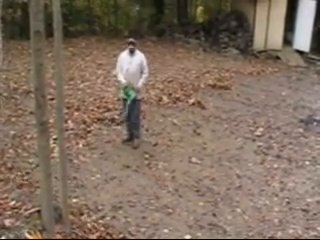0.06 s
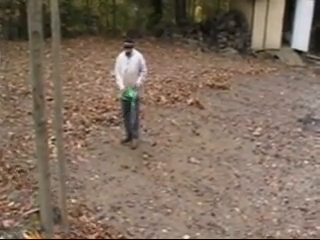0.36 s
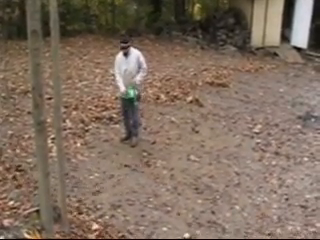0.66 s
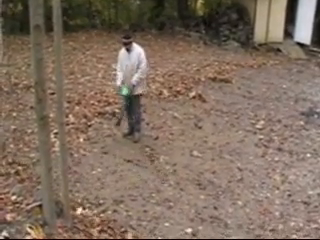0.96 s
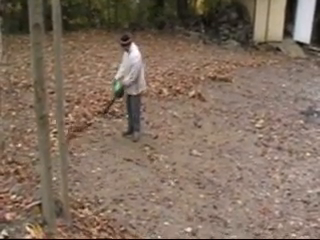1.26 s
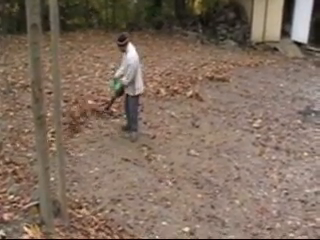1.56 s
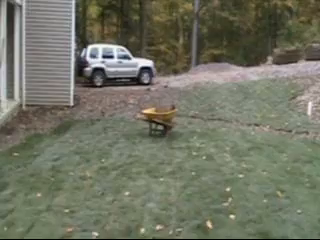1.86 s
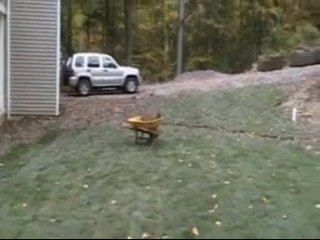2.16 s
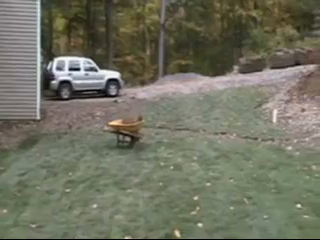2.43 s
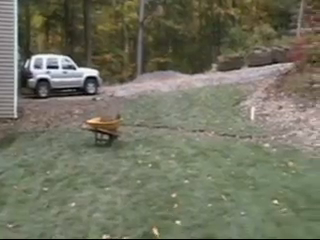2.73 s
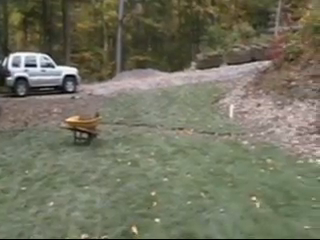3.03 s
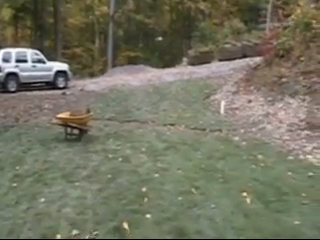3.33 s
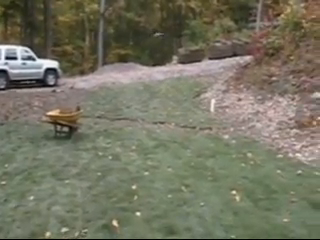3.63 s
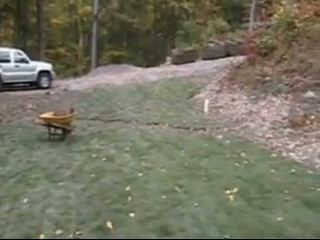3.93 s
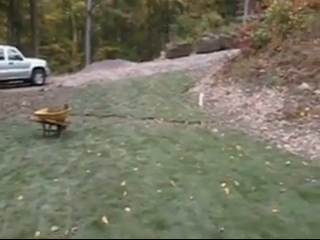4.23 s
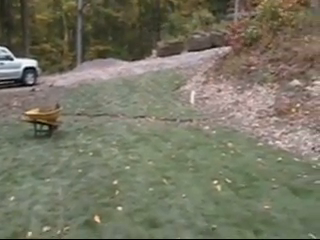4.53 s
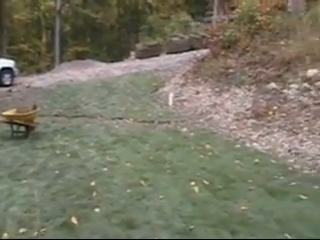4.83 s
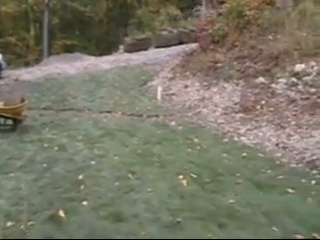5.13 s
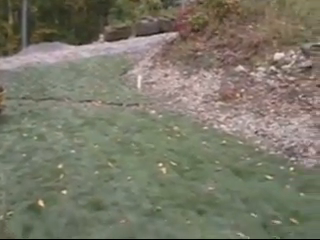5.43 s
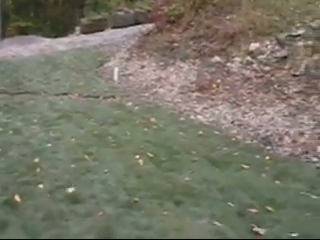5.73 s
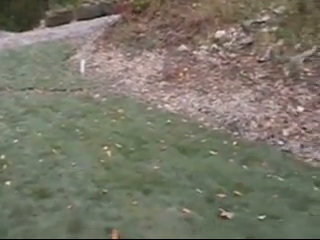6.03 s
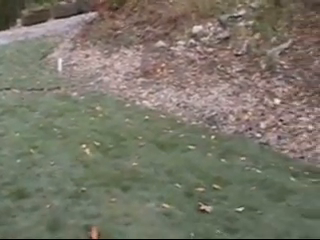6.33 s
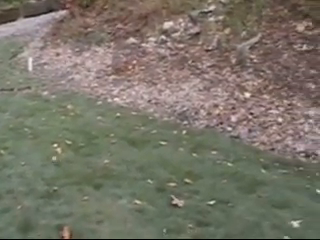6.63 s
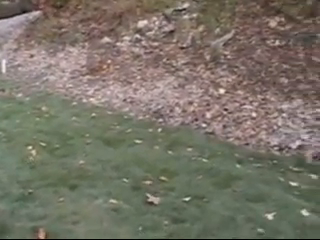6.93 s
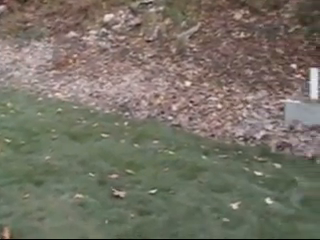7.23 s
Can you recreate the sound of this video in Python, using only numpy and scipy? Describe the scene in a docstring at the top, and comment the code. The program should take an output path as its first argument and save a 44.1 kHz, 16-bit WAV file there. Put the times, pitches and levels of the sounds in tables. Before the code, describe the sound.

Outdoors, a leaf blower is heard close and from the front, its loud rush of air and high whine turning slightly hollow. It breaks off for a split second, then carries on from a distance, muffled at first and growing somewhat louder, with a wavering whine and a low drone. Gusts of wind buffet the microphone throughout this longer second part.

```python
"""A roar with a shrill whine: an electric leaf blower runs at full power in a yard.
Air rushing from its tube makes the roar; its fan whines at multiples of the shaft's turning rate.
It is heard from in front, then, after a short pause of the camera, from further off and turned away,
with wind rumbling on the microphone. The camera samples at 16 kHz, which mirrors the whine
into a thin, high sizzle."""
import sys
import numpy as np
from scipy.fft import rfft, irfft, next_fast_len
from scipy.io import wavfile
from scipy.ndimage import uniform_filter1d

SR = 44100
rng = np.random.default_rng(int(sys.argv[2]) if len(sys.argv) > 2 else 0)


def store_pcm(level_fs):
    """Save levels as 16-bit WAV."""
    pcm = np.round(np.clip(level_fs, -1, 1) * 32767).astype(np.int16)
    wavfile.write(sys.argv[1], SR, np.atleast_2d(pcm).T)


N = 325444
TIME = np.arange(N) / SR

# hollow tones of the tube and housing, with levels relative to the rush of air:
# (pitch [Hz], width [Hz], level in front [dB], level from the side [dB])
TUBE_TONES = [(219.6, 11, -20.5, -24.5), (303, 23, -24.5, -20.5), (490, 33, -16.5, -18.5),
              (1173, 22, -17, -36), (1719, 42, -13, -37)]


def undb(db):
    """Turn decibels into a factor to multiply by."""
    return 10 ** (np.asarray(db) / 20)


def curve(rows):
    """Join (time, value) points with straight lines."""
    times, values = np.transpose(rows)
    return np.interp(TIME, times, values)


def bump(time_s, width_s):
    """A smooth swell of height 1 around the given time."""
    return np.exp(-.5 * ((TIME - time_s) / width_s) ** 2)


def unit(x):
    """Scale a signal to an average strength (rms) of 1."""
    return x / np.sqrt(np.mean(x ** 2))


def filtered(x, response):
    """Make each frequency louder or softer by the factor response(hz)."""
    size = next_fast_len(N, True)
    hz = np.maximum(np.arange(size // 2 + 1) * SR / size, 1)
    return irfft(rfft(x, size) * response(hz), size)[:N]


def colour(points):
    """A filter response drawn through (frequency [Hz], level [dB]) points."""
    point_hz, db = np.transpose(points)
    return lambda hz: undb(np.interp(np.log(hz), np.log(point_hz), db))


def noise(response):
    """Noise of strength 1, shaped by a filter response."""
    return unit(filtered(rng.standard_normal(N), response))


def walk(rate):
    """A random wobble of strength 1 that changes about `rate` times a second."""
    hold = max(int(SR / rate), 2)
    steps = np.repeat(rng.standard_normal(N // hold + 2), hold)
    return unit(uniform_filter1d(steps[rng.integers(hold):][:N], hold))


def wind(flutter_db=2, sway_db=1.1, pop_db=3.5, pop_s=.0013, deep_db=-6, deep_hz=110):
    """Air swirls at the microphone: a rumble that swells and deepens in gusts, and sudden thumps."""
    # strength of the breeze: (time [s], level [dB])
    breeze_levels = [(2.03, -38), (3.05, -41.5), (3.25, -45.5), (3.6, -41), (4.15, -34.5), (5.55, -32.5),
                     (6.5, -40.5), (7.0, -43.5), (7.38, -33.5)]
    # tone colour of its rumble: (frequency [Hz], level [dB])
    rumble_colour = [(20, -32), (50, -9), (90, -3.5), (140, -1), (220, -3.5), (400, -9.5), (800, -14),
                     (2000, -54)]
    # gusts that swell the rumble: (time [s], rise [dB], width [s])
    gusts = [(2.2, 3, .05), (2.427, 3, 0.069), (2.78, 5.5, 0.024), (3.49, 6.5, 0.036), (6.338, 6, 0.037),
             (6.622, 5.5, .03), (6.79, 12, .025), (7.177, 10.5, 0.029)]
    # single thumps of air: (time [s], level [dB], width [s])
    thumps = [(2.035, -35.5, .008), (2.218, -30, .025), (2.275, -35.5, .016), (2.429, -29.5, .02),
              (2.534, -33, 0.087), (2.745, -26.5, 0.012), (2.941, -32.5, 0.0056), (2.979, -29.5, 0.011),
              (3.06, -31.5, .0066), (6.03, -32, .028)]
    # tone colour of the thumps: (frequency [Hz], level [dB])
    thump_colour = [(30, -24), (80, 0), (170, 2), (400, 0), (700, -16), (1500, -19), (4000, -52)]
    swell_db = sum(db * bump(time_s, width_s) for time_s, db, width_s in gusts)
    rumble = noise(colour(rumble_colour)) * undb(swell_db + sway_db * walk(11) + flutter_db * walk(60))
    deep = noise(lambda hz: 1 / (1 + (hz / deep_hz) ** 4)) * (undb(swell_db) - 1) * undb(deep_db)
    breeze = (rumble + deep) * undb(curve(breeze_levels))
    thump_gain, pops = 0, 0
    for time_s, db, width_s in thumps:
        thump_gain += undb(db) * bump(time_s, width_s)
        # the pressure drops sharply as the centre of a swirl passes
        distance_squared = ((TIME - time_s) / pop_s) ** 2
        pops += undb(db + pop_db) * (distance_squared - 1) * np.exp(-.5 * distance_squared)
    return breeze + pops + thump_gain * noise(colour(thump_colour))


def hum(pitch_hz, width_hz):
    """Swirling air makes a hollow space ring: noise in a narrow band around one pitch."""
    return noise(lambda hz: 1 / (1 + (2 * (hz - pitch_hz) / width_hz) ** 2))


def rush(levels, hiss_levels, air, tube_db, hiss_hz, boost_db, churn_db, hiss_churn_db, drift_db=1):
    """The jet of air: a churning roar, a hiss that comes and goes, and the ringing of the tube."""
    roar = filtered(air, lambda hz: 1 / (1 + (hz / hiss_hz) ** 4))
    hiss = (air - roar) * undb(curve(hiss_levels) + drift_db * walk(9) + hiss_churn_db * walk(110))
    jet = (roar + hiss) * undb(boost_db + churn_db * walk(45))
    for (pitch_hz, width_hz, *_), db in zip(TUBE_TONES, tube_db):
        jet += undb(db) * hum(pitch_hz, width_hz)
    return jet * undb(curve(levels))


def fading(echo, fade_hz):
    """An echo slips in and out of step as the blower moves; the complex result holds gain and phase."""
    slip = 2 * np.pi * (rng.random() + np.cumsum(fade_hz * (1 + 0.401 * walk(5))) / SR)
    return (1 + echo * np.exp(1j * slip)) / np.sqrt(1 + echo ** 2)


def whine(levels, tones, weak_db, buzz_db, scatter, flutter_db, fade_hz, throb, throb_hz=15):
    """The fan's tones all follow one shaft; moving air makes each flutter on its own.
    Rows of `tones` are (multiple of the shaft rate, level over time [dB], echo strength)."""
    # speed of the fan at full power: (time [s], shaft rate [Hz])
    shaft_rates = [(0, 168.9), (.45, 169.1), (.8, 169.7), (1.42, 169.2), (1.72, 169.6), (2.55, 169.8),
                   (2.85, 168.7), (3.67, 170.3), (4.0, 169.6), (4.6, 169.7), (4.9, 168.8), (5.5, 169.7),
                   (7.38, 169.3)]
    # the fan's weaker tones: (multiple of the shaft rate, relative level [dB])
    weak_tones = [(1, -20), (5, -20), (6, -21), (14, -21), (17, -19.5), (22, -30), (28, -40), (30, -31),
                  (31.1, -35), (33.1, -35), (33.4, -36), (35.45, -35), (38.4, -38), (40.4, -37),
                  (45.5, -42)]
    echo_follows = 0.52  # the echo follows only this share of a tone's swings in dB
    shaft_angle = 2 * np.pi * np.cumsum(curve(shaft_rates) + 0.1084 * walk(25)) / SR
    weak_gain = undb(curve(levels) + weak_db)
    throb_angle = 2 * np.pi * np.cumsum(throb_hz + 3.4 * walk(6.6)) / SR
    sound = 0
    for multiple, db, echo in tones:
        # the echo counts for more where the direct sound is weak
        echo_share = np.minimum(echo * undb((1 - echo_follows) * (np.mean(db) - db)), 1)
        paths = fading(echo_share, fade_hz)
        gain = np.sqrt(2) * np.abs(paths) * undb(db + flutter_db * walk(45))
        # higher tones are thrown further out of step
        phase = multiple * (shaft_angle + scatter / 15 * walk(13)) + np.angle(paths)
        sound += gain * np.sin(phase)
        if multiple in (13, 15):
            # the buzzing motor adds a thin copy, 23 shaft rates higher
            sound += undb(buzz_db) * np.sqrt(gain * weak_gain) * np.sin(phase + 23 * shaft_angle)
        if multiple == 26:
            # a weaker neighbour just below makes this tone throb
            sound += throb * gain * np.sin(phase - throb_angle)
    for multiple, db in weak_tones:
        # a steady direct sound plus echoes that wander in size and timing
        phase = multiple * shaft_angle
        tone = (1 + .5 * walk(11)) * np.sin(phase) + .5 * walk(10) * np.cos(phase)
        sound += undb(db) * weak_gain * unit(tone)
    return sound


def blower_away():
    """The blower further off and from the side: duller, with fluttering tones and a low drone."""
    # strength of the rush of air: (time [s], level [dB])
    rush_levels = [(2.04, -38), (2.16, -35.5), (2.3, -40), (2.68, -42), (3.15, -41.3), (3.6, -31),
                   (3.85, -28), (4.14, -28.5), (4.32, -32.5), (4.78, -30), (5.04, -33.5), (5.18, -31),
                   (5.62, -31.5), (6.06, -35.5), (6.56, -29), (6.88, -32), (7.08, -28.5), (7.24, -34),
                   (7.38, -31)]
    # tone colour of the distant air: (frequency [Hz], level [dB])
    air_colour = [(30, -14), (100, -10), (300, 1.5), (420, -2), (700, -0.5), (1000, -1), (1400, -1),
                  (2000, -4), (2500, -8), (3000, -12), (4000, -19), (6000, -26), (7500, -31), (8000, -30.5)]
    # hiss against the roar, fading as the microphone turns away: (time [s], level [dB])
    hiss_levels = [(2.03, 2), (3.6, -0.2), (4.6, -0.8), (5.3, -0.7), (6.4, -3.5), (7.38, -3)]
    # a low drone that carries best to the side: (time [s], level [dB])
    drone_levels = [(2.03, -61), (2.8, -60), (3.25, -39), (3.6, -40.5), (4.05, -33), (4.3, -44), (5.0, -45),
                    (5.8, -42.5), (6.6, -41), (7.38, -43)]
    # fan tones at 3, 13, 15 and 26 times the shaft rate, each: (time [s], level [dB])
    tone_3 = [(2.04, -46), (3.42, -51.9), (3.7, -33.5), (4.24, -35.5), (4.36, -45), (4.78, -31),
              (4.98, -46), (5.84, -47), (6.46, -44), (6.58, -34.5), (7.12, -36.5), (7.38, -62)]
    tone_13 = [(2.04, -44.5), (2.82, -52), (2.9, -42.5), (3.02, -52.2), (3.64, -42.5), (3.72, -33.5),
               (4.0, -41.5), (4.1, -29.5), (4.32, -42.5), (4.58, -44), (4.68, -28.5), (4.82, -46),
               (5.68, -42), (5.78, -53), (5.92, -40.5), (6.06, -53), (6.34, -42), (7.38, -48)]
    tone_15 = [(2.04, -47), (2.28, -39.5), (2.52, -57), (2.66, -46), (3.2, -54), (3.36, -36), (3.5, -42),
               (3.92, -36.5), (5.02, -36.5), (5.2, -49), (5.32, -33), (5.62, -36), (5.74, -48.5),
               (6.72, -41.5), (6.86, -56), (7.06, -33.5), (7.16, -48.5), (7.38, -35)]
    tone_26 = [(2.04, -60.5), (3.16, -63.5), (4.06, -44.5), (4.38, -59.5), (4.72, -53), (6.04, -62.5),
               (6.54, -56.8), (7.38, -60.6)]
    tones = [(3, curve(tone_3) - 3, 0.15), (13, curve(tone_13) + 2.5, 0.68),
             (15, curve(tone_15) + 2.5, 0.52), (26, curve(tone_26) + 0.5, 0.35)]
    tube_db = [side_db for _, _, _, side_db in TUBE_TONES]
    jet = rush(rush_levels, hiss_levels, noise(colour(air_colour)), tube_db,
               hiss_hz=1592.4, boost_db=2.0, churn_db=0.95, hiss_churn_db=0.65)
    drone = undb(curve(drone_levels)) * hum(pitch_hz=304.7, width_hz=25)
    fan = whine(rush_levels, tones, weak_db=-4.3, buzz_db=-25.5,
                scatter=0.55, flutter_db=2.0, fade_hz=5.5, throb=0.44)
    return jet + drone + fan


def blower_in_front():
    """The blower close up and facing us; its roar turns hollower as the nozzle swings aside."""
    # strength of the rush of air: (time [s], level [dB])
    rush_levels = [(0, -21.5), (.42, -21.5), (.82, -23.5), (1.25, -22.5), (1.52, -21.5), (1.86, -22.5)]
    # tone colour of the air, nozzle facing us and swung aside, each: (frequency [Hz], level [dB])
    facing_colour = [(30, -29.5), (80, -6.5), (200, -6), (400, -4), (600, 2), (780, -1.5), (1050, -1),
                     (1350, -4), (1750, -2.5), (2400, -3.5), (3000, -12), (4000, -20), (6300, -24),
                     (8000, -29.5)]
    aside_colour = [(30, -25), (100, -11), (190, -1.5), (290, 1.5), (400, -3), (580, 1.5), (900, -7.5),
                    (1300, -5.5), (1780, -0.5), (2400, -3), (3000, -9.5), (4000, -20.5), (6300, -22.5),
                    (8000, -33)]
    # swing of the nozzle: (time [s], share turned aside [0 to 1])
    nozzle_swing = [(0, 0.21), (.85, 0), (1.35, 1), (1.86, 0.97)]
    # steady hiss against the roar: (time [s], level [dB])
    hiss_levels = [(0, -1.6), (1.86, -1.7)]
    # fan tones at 13, 15 and 26 times the shaft rate, changing with the aim: (time [s], level [dB])
    tone_13 = [(0.0, -24), (0.26, -26.5), (0.34, -20), (0.76, -34), (0.88, -26.0), (0.98, -31),
               (1.2, -20.2), (1.26, -37), (1.32, -17), (1.46, -29), (1.54, -18.5), (1.72, -30.5),
               (1.76, -19), (1.86, -29)]
    tone_15 = [(0.0, -26.0), (0.16, -29), (0.26, -46), (0.4, -25), (0.98, -24.5), (1.12, -35), (1.24, -27),
               (1.44, -31.5), (1.52, -22.5), (1.86, -32)]
    tone_26 = [(0.0, -41.5), (0.34, -36.5), (0.44, -45), (0.74, -40.5), (0.82, -52.2), (1.1, -39.5),
               (1.24, -46.5), (1.64, -37.5), (1.86, -50.5)]
    tones = [(3, curve(rush_levels) - 15, 0.036), (13, curve(tone_13) + 2.5, 0.036),
             (15, curve(tone_15) + 2.5, 0.036), (26, curve(tone_26), 0.12)]
    aside = np.clip(curve(nozzle_swing), 0, 1)
    air = np.sqrt(1 - aside) * noise(colour(facing_colour))
    air += np.sqrt(aside) * noise(colour(aside_colour))
    tube_db = [front_db for _, _, front_db, _ in TUBE_TONES]
    jet = rush(rush_levels, hiss_levels, air, tube_db,
               hiss_hz=2820, boost_db=1.5, churn_db=0.83, hiss_churn_db=0.5)
    fan = whine(rush_levels, tones, weak_db=1.5, buzz_db=-26.0,
                scatter=0.29, flutter_db=1.4, fade_hz=3.96, throb=0.23)
    return jet + fan


def scene(pause_s=1.874, resume_s=2.023, tail_db=-21, tail_s=.013):
    """The blower from in front, silence while the camera pauses, then from the side with wind."""
    # the first sound breaks off with a faint, quick fade
    tail = undb(tail_db) * np.exp(-np.abs(TIME - pause_s) / tail_s)
    front = blower_in_front() * np.where(TIME < pause_s, 1, tail)
    side = (blower_away() + wind()) * (TIME > resume_s)
    return (front + side)[None]


def record(dry, sampling_hz=16000, top_hz=12700):
    """The camera keeps the sound below half its sampling rate and leaks a mirror image above that."""
    # strength of the mirror image: (frequency [Hz], level [dB])
    mirror_colour = [(8000, -2), (9700, 2.5), (10700, -1), (11600, -7.5), (12500, -9)]
    kept = filtered(dry[0], lambda hz: hz < sampling_hz / 2)
    mirrored = kept * 2 * np.cos(2 * np.pi * sampling_hz * TIME)
    sizzle = filtered(mirrored, colour(mirror_colour))
    return filtered(kept + sizzle, lambda hz: 1 / (1 + (hz / top_hz) ** 400))[None]


dry = scene()
out = record(dry)
store_pcm(out)
```